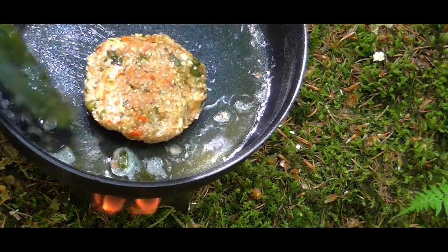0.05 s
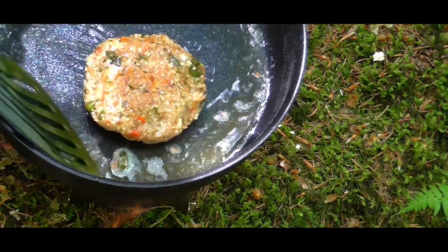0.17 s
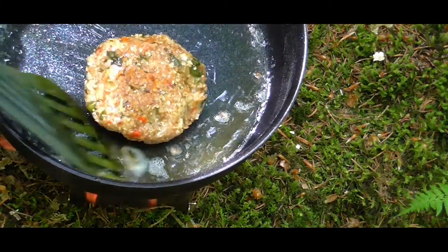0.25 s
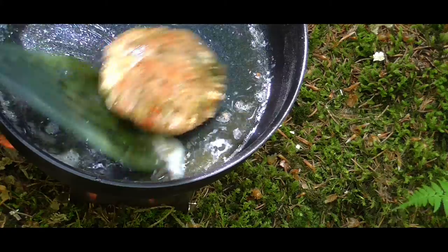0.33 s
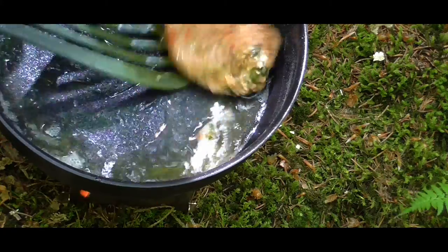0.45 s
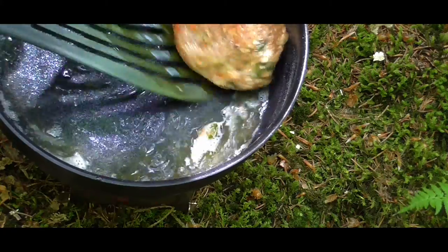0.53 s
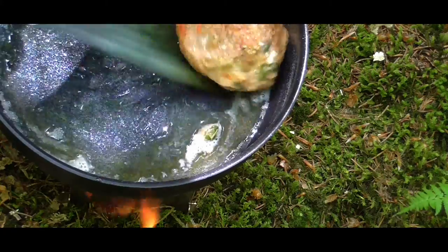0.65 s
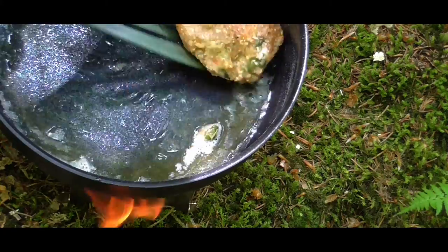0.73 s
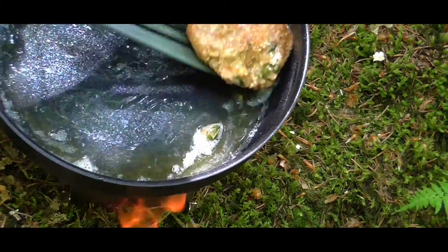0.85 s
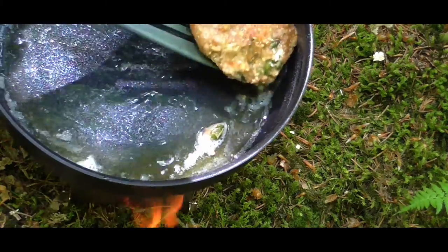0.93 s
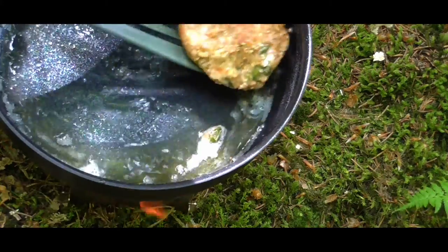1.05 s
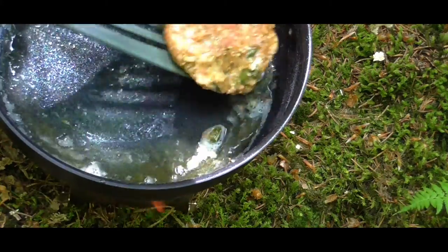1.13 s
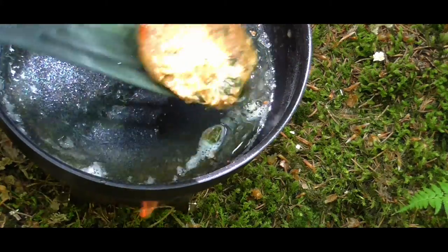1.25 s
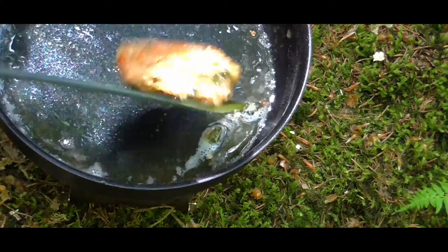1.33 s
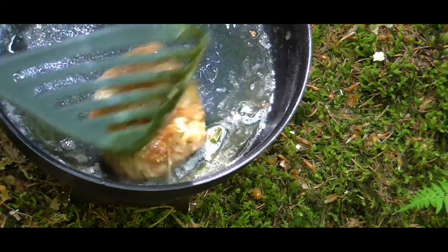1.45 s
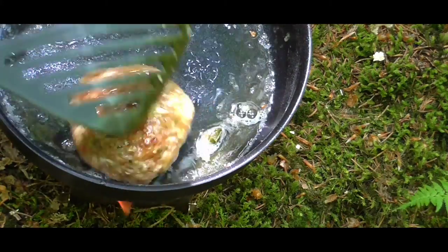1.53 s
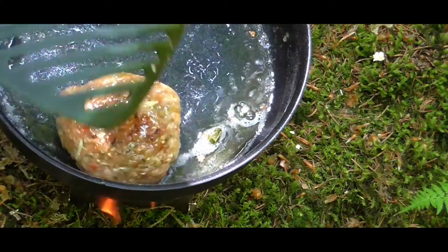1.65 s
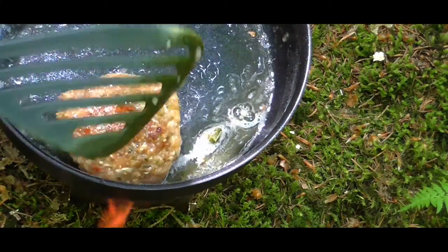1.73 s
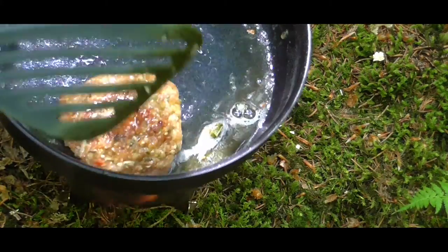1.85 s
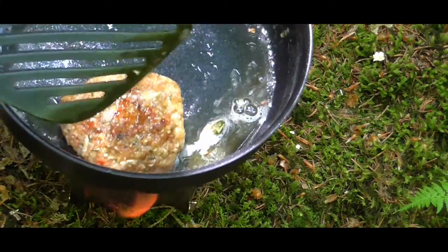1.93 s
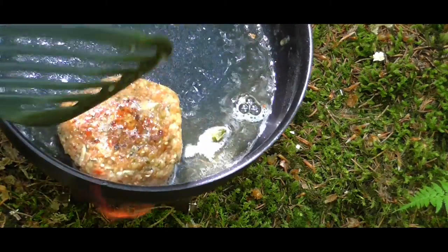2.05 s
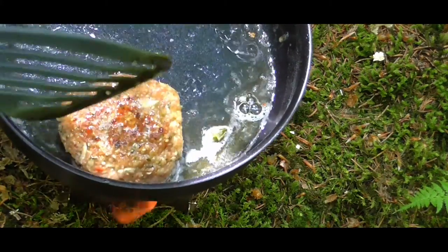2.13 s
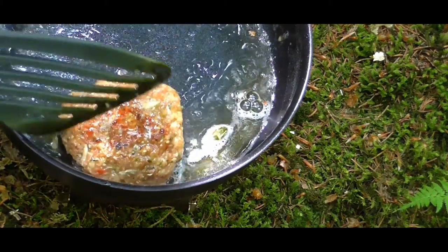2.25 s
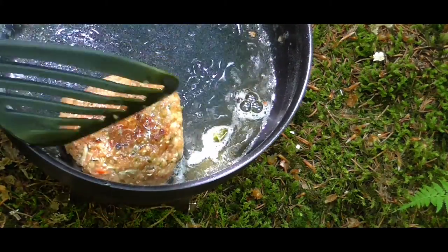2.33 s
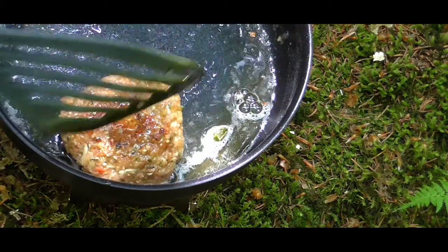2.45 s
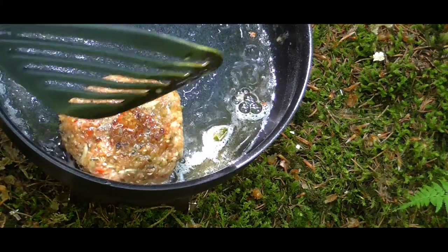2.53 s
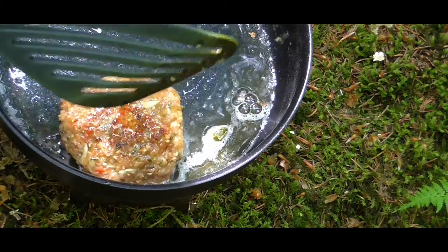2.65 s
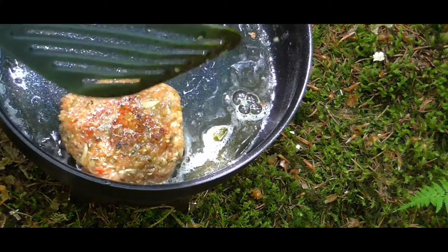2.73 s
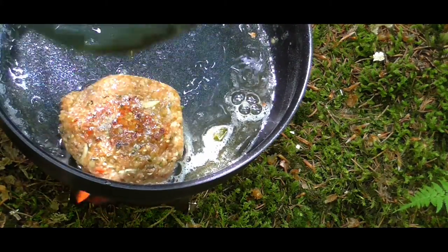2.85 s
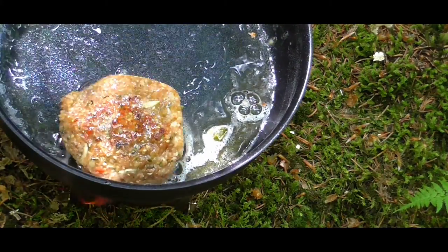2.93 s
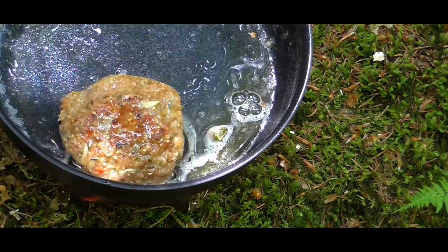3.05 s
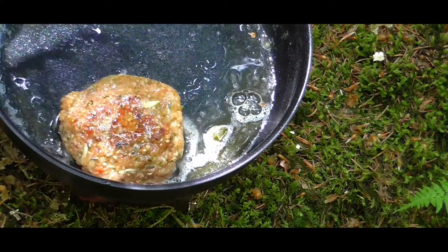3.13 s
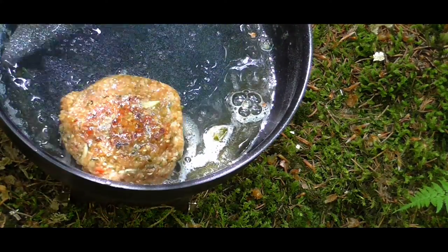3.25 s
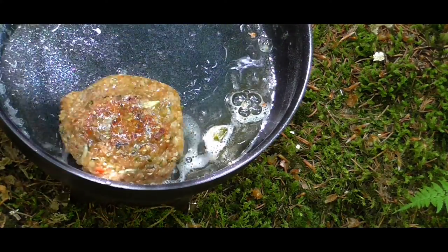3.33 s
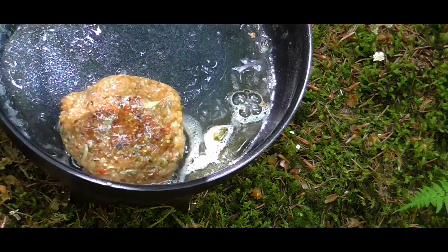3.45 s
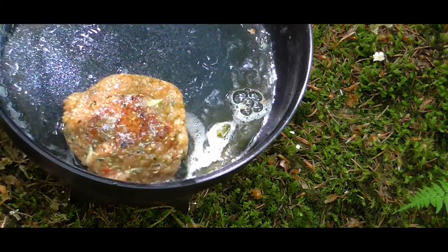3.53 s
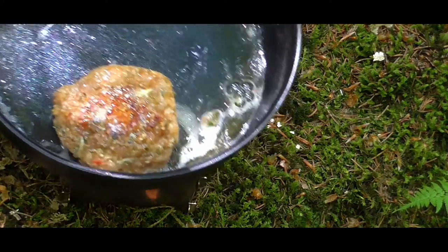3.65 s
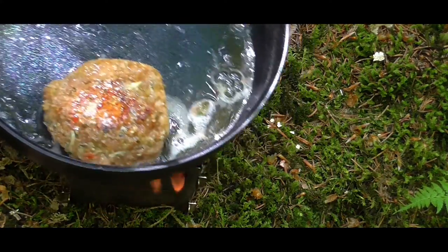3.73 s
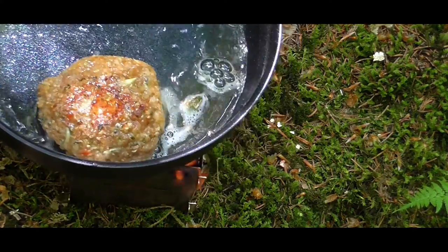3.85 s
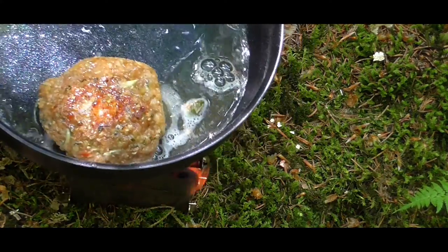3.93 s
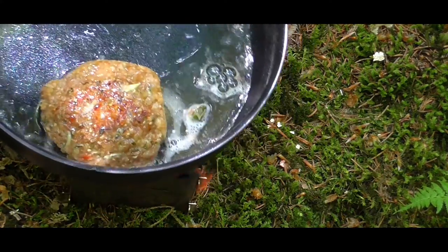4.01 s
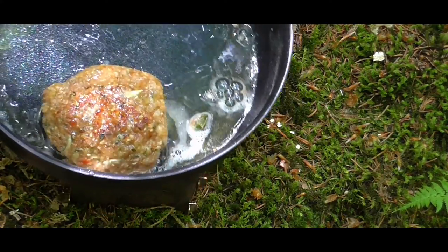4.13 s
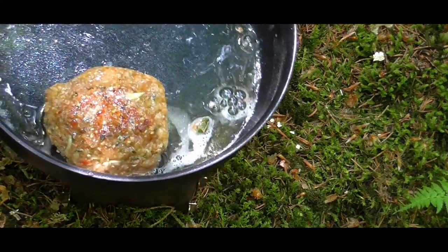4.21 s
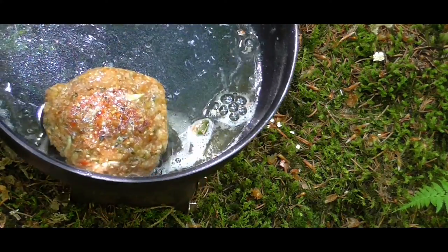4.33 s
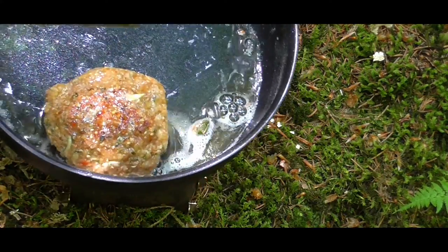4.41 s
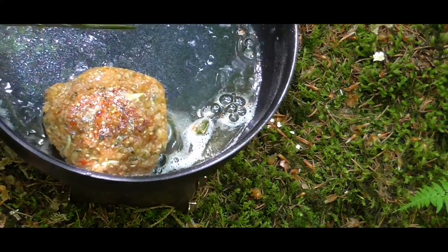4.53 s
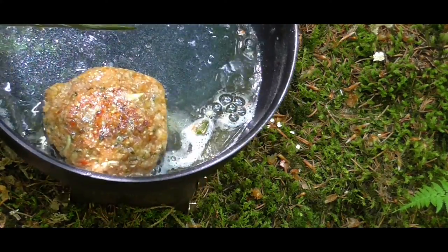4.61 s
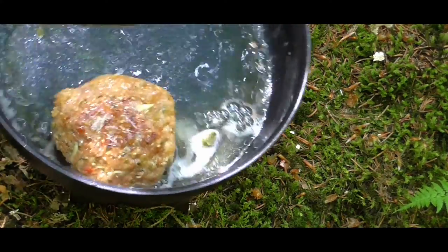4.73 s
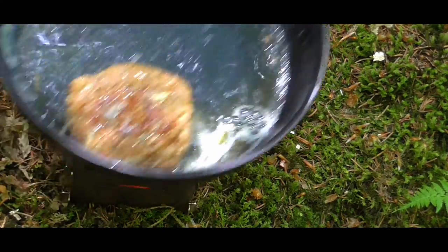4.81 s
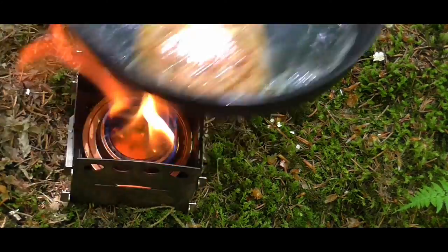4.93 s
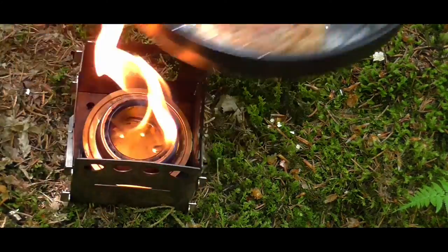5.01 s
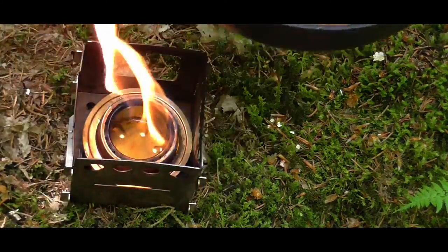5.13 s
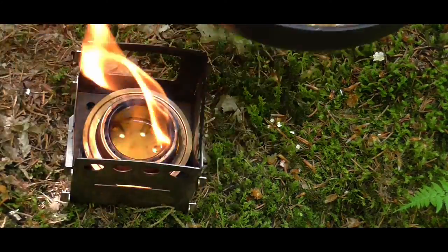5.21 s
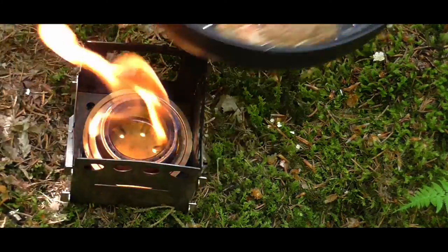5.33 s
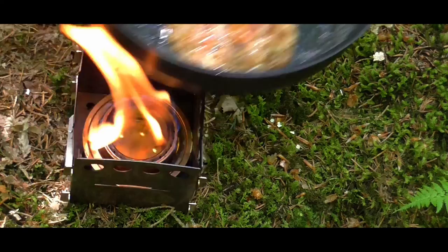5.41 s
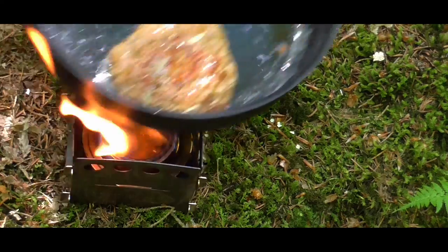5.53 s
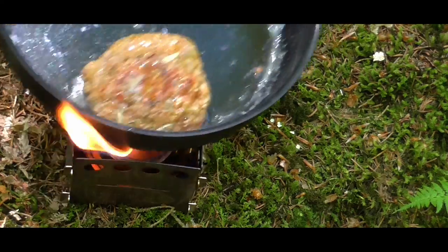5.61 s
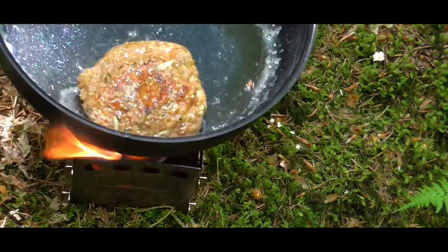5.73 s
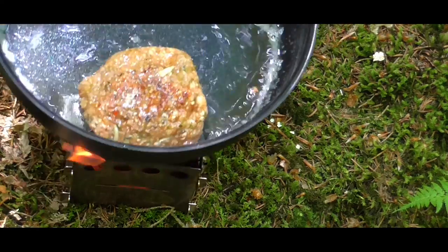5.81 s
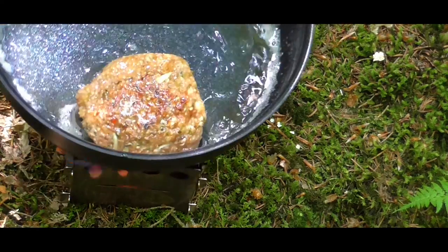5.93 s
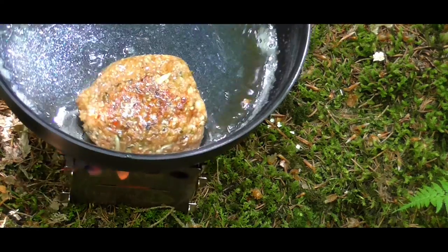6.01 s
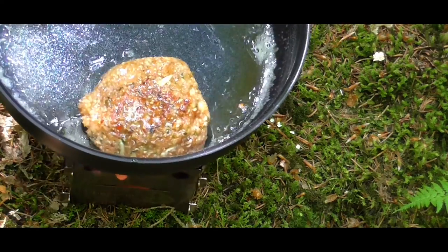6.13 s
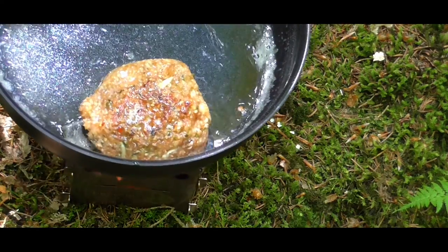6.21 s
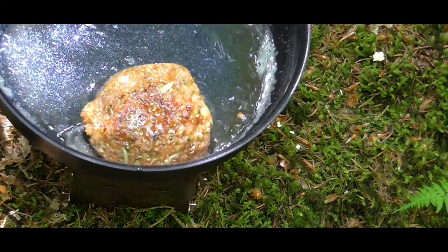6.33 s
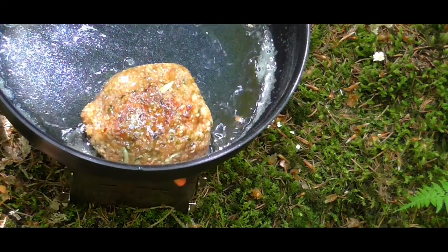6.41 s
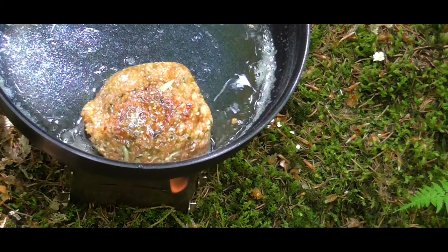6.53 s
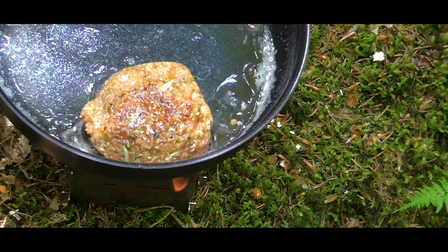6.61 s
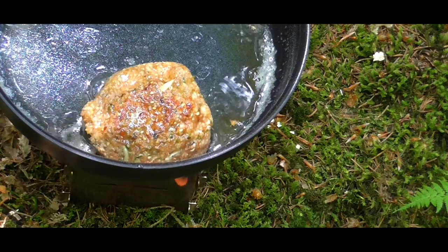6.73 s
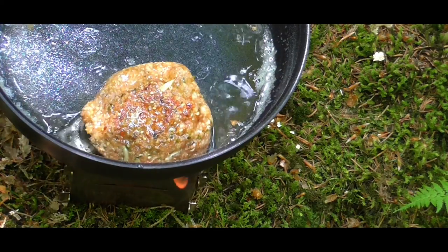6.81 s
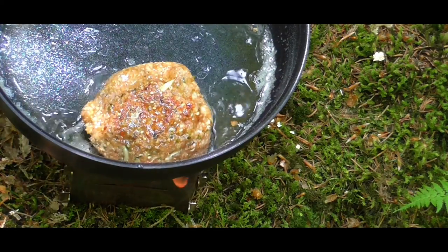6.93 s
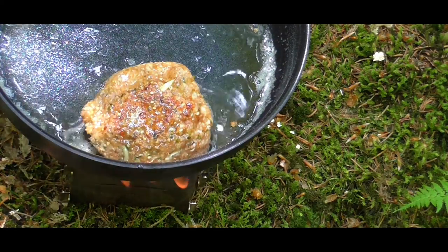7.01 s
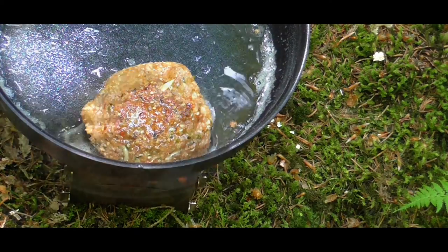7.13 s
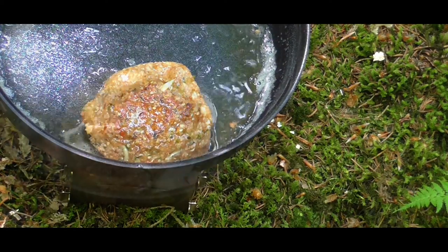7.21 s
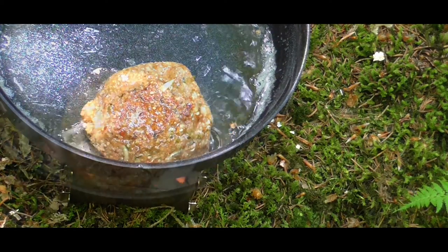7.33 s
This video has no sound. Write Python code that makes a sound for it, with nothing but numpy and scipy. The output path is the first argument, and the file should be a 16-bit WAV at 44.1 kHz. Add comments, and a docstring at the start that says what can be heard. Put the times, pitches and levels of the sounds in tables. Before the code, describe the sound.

Stereo, very near and dry: dense bubbling oil with fine hissing spray and sharp snapping drops. Light spatula taps and rubs come first, the sizzle dips as the patty is lifted, then surges after it flips. Later the pan rubs over its stove, is raised, and lands with the heaviest metallic knocks. One very loud spit hits the microphone just after six seconds. Behind lie quiet air, a low flame and sparse bird calls.

```python
"""Patty frying on a forest stove

Oil round a patty sizzles as dense ringing clicks and hiss; bursting drops pop as decaying resonant noise.
Spatula and stove knock on the pan (base tone, wall modes, crack) and scrape it (stick-slip clicks); it squeaks once.
A far bird whistles in narrow noise bands; air and flame are wide coloured noise.
A puff of air and one drop of fat reach the microphone."""
import sys
import numpy as np
from scipy import signal
from scipy.fft import rfft, irfft, next_fast_len
from scipy.io import wavfile

SR = 44100
rng = np.random.default_rng(int(sys.argv[2]) if len(sys.argv) > 2 else 0)


def put_to_file(sound):
    """Save the sound as 16-bit audio at rate SR, in the file named by the first command-line argument."""
    columns = np.atleast_2d(sound).T  # one column per channel
    safe = np.clip(columns, -1, 1)
    whole_steps = np.round(safe * 32767)
    wavfile.write(sys.argv[1], SR, whole_steps.astype(np.int16))


N = 324576
TIME_S = np.arange(N) / SR

# forest air spectrum: hz, relative_db (per Hz)
AIR_COLOUR = [(30, -43), (90, -3.5), (150, -4.5), (290, 2.5), (410, 1), (560, 1), (760, 1), (1040, -2),
              (1340, -4.5), (1700, -1), (1950, -11.5), (2600, -11), (3400, -9.5), (6000, -31)]
# left-right correlation of air and flame: hz, correlation (-1..1)
AIR_CORRELATION = [(30, 0), (80, 0.97), (140, 0.0084), (300, 0.62), (1100, 0.37), (2000, 0.87)]
# flame rumble before trim: time_s, level_db
FLAME_LEVEL = [(0.0, -66.5), (1.6, -77), (2.03, -69), (2.71, -68), (3.26, -63), (3.54, -70.5), (4.71, -71),
               (4.94, -67), (6.27, -70), (6.72, -69), (7.36, -78)]
# bird calls: start_s, level_db, pitch_hz (at the crest)
BIRD_WHISTLES = [(0.0, -48, 3580), (0.94, -50, 3640), (1.13, -64, 3560), (1.208, -53, 6600),
                 (1.95, -51.5, 3510), (2.99, -51.5, 3730), (5.28, -47, 3670)]
# oil bubbling round the patty before trim: time_s, level_db
OIL_LEVEL = [(0.0, -53), (0.18, -53), (0.61, -47), (0.96, -53), (1.21, -54), (1.47, -54), (1.66, -46.5),
             (2.79, -47), (3.2, -50), (4.0, -46), (4.28, -50), (4.49, -50), (5.02, -47), (5.56, -51),
             (5.86, -46), (6.44, -51), (7.2, -49), (7.36, -51)]
# sizzle flares as the patty slides or turns or the oil sloshes, before trim:
# crest_s, rise_s, fall_s, spray_db, sear_db
SIZZLE_FLARES = [(0.518, .33, .85, -51, -51), (1.6, .17, .6, -46, -51), (2.202, .15, .45, -47.5, -66),
                 (3.3, .5, .35, -52, -63), (3.78, .25, .12, -46, -50), (4.072, .1, .25, -44.5, -51),
                 (4.72, .1, .3, -53, -58.5), (5.12, .3, .6, -46, -57), (5.952, .45, .22, -56, -61),
                 (7.13, .18, .7, -58, -60)]
# bubbling spectrum: hz, relative_db (per Hz)
BUBBLE_SPECTRUM = [(1000, -25.5), (1700, -2.5), (2500, -11), (3000, -31), (3700, -2), (4900, -2), (6500, 0),
                   (7200, -1.5), (8000, -18), (11000, -10.5), (15000, -32)]
# fat spray spectrum: hz, relative_db (per Hz)
SPRAY_SPECTRUM = [(4000, -40), (8300, -2), (9200, -1), (10200, 2.5), (12300, -12), (13600, -19),
                  (16000, -48)]
# searing spectrum: hz, relative_db (per Hz)
SEAR_SPECTRUM = [(900, -15), (2500, -13.5), (4500, -8), (7000, -1), (9000, -8.5), (12000, 4.5), (15800, -7)]
# loudest drops bursting in the fat: start_s, level_db (over 1 ms), pitch_hz, nominal_width_hz
LOUD_DROPS = [(0.136, -24.5, 5840, 1190), (0.5077, -24, 8400, 3900), (0.532, -26, 6940, 1300),
              (0.5764, -26, 8100, 4000), (0.7214, -21.5, 9600, 6400), (1.0216, -21, 5870, 2000),
              (1.7534, -25.5, 6200, 5600), (1.8739, -27, 6200, 5500), (1.9773, -19.5, 10600, 1490),
              (2.0227, -22.5, 5170, 2300), (2.178, -23, 6600, 1200), (2.216, -23.5, 5400, 1200),
              (2.3316, -21.5, 5300, 1590), (2.394, -24.5, 6200, 5330), (2.529, -24, 8800, 7050),
              (2.647, -27, 6640, 900), (2.731, -24, 3950, 2980), (2.829, -20, 10400, 6340),
              (2.8755, -19.5, 4870, 6560), (3.1417, -21.5, 5500, 2000), (3.2336, -25, 5600, 4900),
              (3.2803, -26.5, 5900, 1300), (3.5828, -21.5, 8100, 6640), (3.7836, -15, 6400, 910),
              (4.026, -17.5, 7000, 4150), (4.3741, -25.5, 5240, 1720), (4.4229, -22, 11600, 6700),
              (5.0033, -23, 6570, 5600), (5.188, -30, 7300, 4500), (5.556, -21.5, 5500, 1200),
              (6.0078, -27.5, 6550, 2400), (6.0532, -10, 5600, 2950), (6.1905, -25.5, 6300, 2020),
              (6.3247, -30, 3330, 2560), (6.429, -28, 4940, 2500), (6.6618, -25.5, 7400, 2700),
              (6.813, -22.5, 5760, 900), (7.038, -27.5, 6600, 3070), (7.331, -25, 4930, 890)]
# spatula and stove blows on the pan, before part trims:
# start_s, level_db, base_pitch_hz, wall_db (re level), crack_db (re level)
PAN_BLOWS = [(0.098, -18, 867, -11.5, -2), (0.191, -35.5, 905, -5, 17), (0.203, -33.5, 943, -7, 6.5),
             (0.232, -26, 782, -4, -20), (0.2416, -23, 932, -8, -28), (0.967, -29.5, 728, -17, -22),
             (1.504, -29, 817, -6, -8), (1.526, -34, 693, -18, -3), (1.551, -22.5, 689, -11, -25),
             (1.573, -27, 970, -10, -16), (1.621, -34, 960, -22, -9), (2.041, -28.5, 980, -17, -18),
             (2.047, -24.5, 718, -19, -3.5), (2.077, -29.5, 982, -18, -18), (2.236, -29, 970, -4, -26),
             (2.352, -23.5, 683, -18, -14), (2.4, -30.5, 982, -11, -24), (5.656, -15.5, 613, -3, -6),
             (5.703, -16, 603, -11, -20), (5.828, -21, 544, -17.5, -22), (5.94, -23, 744, -13, -9),
             (6.027, -28, 710, -7, -13), (6.427, -35, 850, -7.5, -10)]
# pan wall resonances: pitch_hz, width_hz, relative_db
WALL_MODES = [(222, 120, -6), (330, 120, -4.5), (630, 117, 4.5), (750, 32, 6), (1060, 14, 6.5),
              (1410, 72, 1), (1603, 87, 5), (1865, 92, -1), (2141, 64, 7), (2300, 67, 1), (2893, 52, -5.5),
              (3614, 49, -2.5), (4530, 270, -5.5), (5500, 48, 1.5), (6200, 210, -5)]
# hard contact spectrum: hz, relative_db (per Hz)
CRACK_SPECTRUM = [(150, -15.5), (400, -0.5), (1500, -1.5), (2900, -13.5), (5200, 0.5), (6500, -0.5),
                  (8000, -4), (10500, 1.5), (16000, -17)]
# rubbing strokes on the pan, before part trims:
# crest_s, rise_s, fall_s, level_db, base_pitch_hz, base_width_hz, wall_db (re level)
RUB_STROKES = [(0.405, 0.11, 0.15, -42, 870, 200, 0), (0.54, 0.042, 0.068, -42, 790, 150, -20),
               (0.96, 0.2, 0.089, -45, 764, 160, -18), (1.56, 0.19, 0.13, -46, 766, 200, -9.5),
               (3.53, 0.046, 0.075, -43, 885, 130, -6.5), (3.65, 0.09, 0.12, -36, 591, 70, -13),
               (3.815, 0.12, .045, -34, 630, 161, -2.5), (3.95, .06, .06, -49.5, 630, 89, -16),
               (4.04, 0.058, 0.29, -25.5, 885, 165, -10.5), (4.705, 0.033, 0.096, -32.5, 706, 223, -9),
               (5.78, 0.079, 0.12, -42, 620, 45, -4), (5.89, 0.052, 0.057, -43.5, 540, 40, -18),
               (5.995, 0.029, 0.046, -42, 565, 40, -21), (6.07, 0.036, 0.12, -45, 774, 40, -19),
               (6.36, 0.3, 0.093, -42.5, 780, 60.4, -8)]
# squeak of the pan's base: time_s, level_db, pitch_hz
SQUEAK_CURVE = [(6.362, -64, 974), (6.375, -34.5, 1010), (6.386, -41, 1156), (6.396, -44, 1550),
                (6.41, -56, 1680)]
# phase lead of the left port: hz, phase_rad
PORT_PHASE_LEAD = [(0, 0), (7670, 0.031), (9390, -1.2), (10500, 0.49), (11900, 0.49), (16500, -0.012)]

AIR_DB = -51
RESTING_SPRAY_DB, RESTING_SEAR_DB = -7, -17  # patty still; re bubbling, before trims
# spatula holds the patty off the pan
LIFT_CREST_RISE_FALL_S, LIFT_DB = (1.33, .5, .15), -6
# random small drops: mean rate, exponent on spray gain, faintest level, range above it
DROPS_PER_S, DROPS_SPRAY_EXPONENT, DROP_MIN_DB, DROP_RANGE_DB = 27, .75, -35.5, 11
DROP_PITCH_HZ, DROP_WIDTH_HZ = (4170, 11250), (880, 7500)  # lowest, highest
SWELL_DB = 20  # change over one rise or fall time
PUFF_CREST_RISE_FALL_S, PUFF_DB = (3.42, 0.068, 0.054), -52
# drop of fat on the microphone: thump and short housing ring, as filter gains on an impulse
SPLAT_S, THUMP_GAIN_DB = 6.0537, 11
HOUSING_GAIN_DB, HOUSING_HZ, HOUSING_WIDTH_HZ = 12, 1550, 240
CUTOFF_HZ = 15900


def from_db(db):
    """Decibels to gain."""
    return 10 ** (np.asarray(db) / 20)


def rms_one(x):
    """Scale to rms 1."""
    return x / np.sqrt(np.mean(x ** 2) + 1e-20)


def head_one(x, seconds):
    """Scale energy to that of rms 1 held for the given time."""
    return x / np.sqrt(np.sum(x ** 2) / (seconds * SR) + 1e-20)


def in_time(rows, t):
    """Columns of a curve table, interpolated at times t."""
    s, *columns = np.transpose(rows)
    return [np.interp(t, s, c) for c in columns]


def per_bin(points, size):
    """Table interpolated over log frequency at each transform bin."""
    hz, value = np.transpose(points)
    bin_hz = np.arange(size // 2 + 1) * SR / size
    return np.interp(np.log(bin_hz + 1), np.log(hz), value)


def colour(x, spectrum):
    """Minimum-phase filter with the given spectrum, built by folding the cepstrum."""
    n = x.shape[-1]
    size = 2 * next_fast_len(n // 2 + 2048)
    cepstrum = irfft(np.log(from_db(per_bin(spectrum, size))))
    cepstrum[1:size // 2] *= 2
    cepstrum[size // 2 + 1:] = 0
    response = np.exp(rfft(cepstrum))
    return irfft(rfft(x, size) * response)[..., :n]


def cut(x, hz, kind, order=2):
    """Butterworth low- or high-pass."""
    sections = signal.butter(order, min(hz, .45 * SR), kind, fs=SR, output="sos")
    return signal.sosfilt(sections, x)


def resonator(hz, width_hz):
    """Coefficients of a two-pole resonance with about unit peak gain."""
    r = np.exp(-np.pi * width_hz / SR)
    return (1 - r * r) / 2 * np.array([1, 0, -1]), [1, -2 * r * np.cos(2 * np.pi * hz / SR), r * r]


def resonate(x, hz, width_hz):
    """Pass x through one resonance."""
    return signal.lfilter(*resonator(hz, width_hz), x + 1e-18)


def drift(knots_per_s, n):
    """Random piecewise-linear curve of rms 1."""
    knots = rng.standard_normal(8192)
    position = np.arange(n) / SR * knots_per_s % len(knots)
    return rms_one(np.interp(position, np.arange(len(knots)), knots))


def burst(t60_s, size):
    """Exponentially decaying noise."""
    return rng.standard_normal(size) * from_db(-60 * np.arange(size) / SR / t60_s)


def grains(per_s, spread_db, n, limit=4.48):
    """Random clicks of either sign: many small, a few large."""
    sizes = from_db(spread_db * np.minimum(rng.exponential(1, n), limit))
    sizes = sizes * rng.choice([-1, 1], n)
    return sizes * (rng.random(n) < per_s / SR)


def swell(crest_s, rise_s, fall_s, roundness):
    """Gain that climbs to 1 at the crest and sinks again."""
    away = np.maximum((crest_s - TIME_S) / rise_s, (TIME_S - crest_s) / fall_s)
    gain, near = np.zeros(N), away < 3
    gain[near] = from_db(-SWELL_DB * away[near] ** roundness)
    return gain


def add(out, s, x):
    """Mix x into out from time s."""
    i = max(round(s * SR), 0)
    out[i:i + len(x)] += x[:N - i]


def wide_noise(spectrum):
    """Coloured stereo noise, rms 1; mid and side weights set the correlation."""
    alike = np.clip(per_bin(AIR_CORRELATION, N), -1, 1)
    mid, side = rfft(rng.standard_normal((2, N)))
    stereo = np.sqrt(1 + alike) * mid + np.sqrt(1 - alike) * side * [[1], [-1]]
    return rms_one(colour(irfft(stereo, N), spectrum))


def surroundings(flame_trim_db=3.5, waver_db=2.0):
    """Wide forest air with a wavering level, plus the flame's low rumble."""
    rumble = wide_noise([(25, -45), (40, -18), (60, -10.5), (85, -7.5), (115, -9.5), (170, -13.5), (400, -45)])
    flame = from_db(in_time(FLAME_LEVEL, TIME_S)[0] + flame_trim_db) * rumble
    air = from_db(AIR_DB + waver_db * drift(6.3, N)) * wide_noise(AIR_COLOUR)
    return air + flame


def bird(swell_s=.09, width_hz=380, fall_hz_per_s=500):
    """Falling whistles, smeared by the trees into narrow noise bands that swell and fade."""
    out, t = np.zeros(N), TIME_S[:SR // 2]
    shape = (t / swell_s * np.exp(1 - t / swell_s)) ** 2
    for s, db, hz in BIRD_WHISTLES:
        in_phase, across = cut(rng.standard_normal((2, len(t))), width_hz / 2, "low")
        phase = 2 * np.pi * np.cumsum(hz - fall_hz_per_s * (t - swell_s)) / SR
        call = rms_one(in_phase * np.cos(phase) + across * np.sin(phase))
        # a call at the very start enters at its crest
        begun = round(swell_s * SR) if s < swell_s else 0
        add(out, s, (from_db(db) * call * shape)[begun:])
    return out


def frying_strength(roundness=1.5):
    """Bubbling, spray and sear gains: all follow the oil; spray and sear also flare, summed as power."""
    lift_db = LIFT_DB * swell(*LIFT_CREST_RISE_FALL_S, roundness)
    bubbles = from_db(in_time(OIL_LEVEL, TIME_S)[0] + lift_db)
    spray_power = (bubbles * from_db(RESTING_SPRAY_DB)) ** 2
    sear_power = (bubbles * from_db(RESTING_SEAR_DB)) ** 2
    for s, rise, fall, spray_db, sear_db in SIZZLE_FLARES:
        flare = swell(s, rise, fall, roundness)
        spray_power = spray_power + (from_db(spray_db) * flare) ** 2
        sear_power = sear_power + (from_db(sear_db) * flare) ** 2
    return bubbles, np.sqrt(spray_power), np.sqrt(sear_power)


def fizz(spectrum, per_s, spread_db, clump_db, hiss_db,
         bubble_width_hz=1100, patchy_db=2.5, scatter_db=-2.5):
    """Tiny bubbles burst in clumps, each ringing a few cycles, over even hiss; stereo, rms 1."""
    clicks = grains(per_s * from_db(clump_db * drift(45, N)), spread_db, N)
    pitches_hz = np.linspace(1800, 15200, num=16)
    dealt = rng.integers(0, len(pitches_hz), N)
    # each pitch reads the level curve at its own offset
    patches = from_db(patchy_db * drift(22, N))
    bubbles = np.zeros(N)
    for k, hz in enumerate(pitches_hz):
        ringing = resonate(clicks * (dealt == k), hz, bubble_width_hz)
        bubbles += ringing * np.roll(patches, rng.integers(N))
    # tearing films add broad ticks; the pan scatters both for a few ms
    direct = rms_one(rms_one(bubbles) + 0.44 * rms_one(clicks))
    scatter = [rms_one(signal.fftconvolve(direct, burst(0.017, size=768))[:N]) for _ in range(2)]
    mid = direct + from_db(scatter_db) * scatter[0] + from_db(hiss_db) * rng.standard_normal(N)
    side = 0.12 * cut(scatter[1], 10200, "high")
    return rms_one(colour(mid + side * [[1], [-1]], spectrum))


def sizzle(bubbles, spray, sear, bubbles_trim_db=1.5, spray_trim_db=-1.5, sear_trim_db=9.5):
    """Oil bubbles round the patty and throws fine spray; wet meat hisses brightly on the metal."""
    bubbling = fizz(BUBBLE_SPECTRUM, per_s=4500, spread_db=4.5, clump_db=3.5, hiss_db=-3.0)
    spraying = fizz(SPRAY_SPECTRUM, per_s=3200, spread_db=8.0, clump_db=4.0, hiss_db=-29)
    searing = fizz(SEAR_SPECTRUM, per_s=3200, spread_db=6.0, clump_db=0.0, hiss_db=-31)
    return (bubbles * from_db(bubbles_trim_db) * bubbling
            + spray * from_db(spray_trim_db) * spraying
            + sear * from_db(sear_trim_db) * searing)


def small_drops(spray):
    """Random rows shaped like LOUD_DROPS, denser where spray is strong; most are faint."""
    rate = spray ** DROPS_SPRAY_EXPONENT
    due = np.cumsum(rate / rate.mean()) * DROPS_PER_S / SR
    when, size, pitch, width = rng.random((600, 4))[:int(due[-1])].T
    start_s = np.interp(when * due[-1], due, TIME_S)
    level_db = DROP_MIN_DB + DROP_RANGE_DB * size ** 2
    pitch_hz = DROP_PITCH_HZ[0] * (DROP_PITCH_HZ[1] / DROP_PITCH_HZ[0]) ** pitch
    width_hz = DROP_WIDTH_HZ[0] * (DROP_WIDTH_HZ[1] / DROP_WIDTH_HZ[0]) ** width
    return list(zip(start_s, level_db, pitch_hz, width_hz))


def pops(spray, snap_t60_s=0.0037, tail_t60_s=0.073, tail_db=-19, tick_db=-17, tick_hz=1200):
    """A drop flashes to steam: a snap rings its cavity and spattered fat trails after it."""
    out, t = np.zeros(N), TIME_S[:1024]
    tail = from_db(tail_db) * .5 * from_db(-60 * t / tail_t60_s)
    dying = from_db(-60 * t / snap_t60_s) + tail
    snaps = rng.standard_normal((700, len(t))) * dying
    ticks = cut(snaps, tick_hz, "high")
    for (s, db, hz, width), snap, tick in zip(LOUD_DROPS + small_drops(spray), snaps, ticks):
        cavity = resonate(resonate(snap, hz, 1.32 * width), hz, 2.1 * width)
        pop = cavity + from_db(tick_db) * tick
        add(out, s, from_db(db) * head_one(pop, 1 / 1000))
    return out


def pan_wall(x):
    """Wall modes in alternating sign; random strengths stand for the place of contact."""
    luck_db = rng.normal(0, 1.2, len(WALL_MODES))
    return sum((-1) ** k * from_db(db + luck_db[k]) * resonate(x, hz, width)
               for k, (hz, width, db) in enumerate(WALL_MODES))


def knocks(base_t60_s=0.063, base_db=-1.0, clack_db=-4.5, crack_trim_db=1.0,
           rattle_t60_s=0.011, rattle_db=-6, crack_t60_s=0.055,
           ring_hz=583, ring_width_hz=7, ring_db=1.0):
    """Each blow rings the base, whose pitch shifts with its load, and cracks into the wall modes."""
    out, t = np.zeros(N), TIME_S[:SR // 3]
    size = len(t)
    for s, db, hz, wall_db, crack_db in PAN_BLOWS:
        rattle = head_one(burst(rattle_t60_s, size), 1 / SR)
        contact = signal.unit_impulse(size) + from_db(rattle_db) * rattle
        envelope = from_db(-60 * t / base_t60_s) * (1 - np.exp(-t / 0.0015))
        base = head_one(np.sin(2 * np.pi * hz * t) * envelope, 0.0046)
        # a blow near the free pan's note leaves it ringing
        base = base + from_db(ring_db) * resonate(base, ring_hz, ring_width_hz)
        clack = head_one(resonate(resonate(burst(0.098, size), hz, 280), hz, 1120), 0.0029)
        walls = head_one(pan_wall(contact), 0.0079)
        crack = head_one(colour(burst(crack_t60_s, size), CRACK_SPECTRUM), 0.0034)
        blow = (from_db(base_db) * base + from_db(clack_db) * clack
                + from_db(wall_db) * walls + from_db(crack_db + crack_trim_db) * crack)
        add(out, s + 0.00097, from_db(db) * blow)
    return cut(out, 170, "high", order=3)


def scrapes(slips_per_s=450, spread_db=2.0, judder_db=3.0, base_db=2.0, wall_trim_db=2.0,
            grit_db=-7, body_db=-18, roundness=1.32):
    """Stick-slip sends dense uneven clicks into the pan; each stroke swells and fades."""
    out, n = np.zeros(N), SR
    for s, rise, fall, db, hz, width, wall_db in RUB_STROKES:
        start = max(round(s * SR) - n // 2, 0)
        push = swell(s, rise, fall, roundness)[start:start + n]
        slips = rms_one(grains(slips_per_s, spread_db, n, limit=5.4)) + .5 * rng.standard_normal(n)
        slips = slips * from_db(judder_db * drift(129.55, n))
        # contact point sets base pitch and damping
        base = cut(cut(resonate(slips, hz, width), 480, "high"), 1230, "low")
        body = resonate(cut(slips, 140, "high"), 410, 110)
        # wall modes and grit share one level: both grow as contact hardens
        walls = cut(cut(pan_wall(slips), 1000, "high"), 6000, "low")
        grit = cut(cut(slips, 3500, "high"), 4000, "low")
        hard = rms_one(walls) + from_db(grit_db) * rms_one(grit)
        sound = (from_db(base_db) * rms_one(base) + from_db(body_db) * rms_one(body)
                 + from_db(wall_db + wall_trim_db) * hard)
        out[start:start + n] += from_db(db) * sound * push
    return out


def on_microphone(tick_gain_db=-2):
    """Puff and splat thump push the two ports oppositely; housing ring and tick are alike in both."""
    hit, together, opposed = signal.unit_impulse(2048), np.zeros(N), np.zeros(N)
    ring = from_db(HOUSING_GAIN_DB) * resonate(hit, HOUSING_HZ, HOUSING_WIDTH_HZ)
    tick = from_db(tick_gain_db) * cut(hit, 9300, "high")
    add(together, SPLAT_S, ring + tick)
    add(opposed, SPLAT_S, from_db(THUMP_GAIN_DB) * cut(cut(hit, 1300, "low"), 60, "high"))
    wind = rms_one(cut(cut(rng.standard_normal(N), 100, "low"), 28, "high"))
    puff = from_db(PUFF_DB) * swell(*PUFF_CREST_RISE_FALL_S, roundness=2) * wind
    return together + (opposed + puff) * [[-1], [1]]


def squeak(rough=0.044):
    """As the pan slides into place, slips of its base lock into a rough rising note."""
    out, t = np.zeros(N), np.arange(SQUEAK_CURVE[0][0], SQUEAK_CURVE[-1][0], 1 / SR)
    db, hz = in_time(SQUEAK_CURVE, t)
    phase = 2 * np.pi * np.cumsum(hz * (1 + rough * drift(430, len(t)))) / SR
    add(out, t[0], from_db(db) * rms_one(np.sin(phase)))
    return out


def scene():
    """Pan close and central; ground and trees return a faint wide scatter."""
    bubbles, spray, sear = frying_strength()
    pan = sizzle(bubbles, spray, sear) + knocks() + scrapes() + squeak() + pops(spray)
    returns = np.array([signal.fftconvolve(side, head_one(burst(0.14, size=4096), 1 / SR))[:N]
                        for side in pan])
    return pan + from_db(-25) * returns + bird() + surroundings() + on_microphone()


def record(dry):
    """Two microphone ports differ in treble colour and phase; an elliptic low-pass cuts the top."""
    left, right = dry
    left = irfft(rfft(left) * np.exp(1j * per_bin(PORT_PHASE_LEAD, N)), N)
    left = from_db(-1.26) * (left - 0.47 * resonate(left, 9200, 4200))
    right = from_db(-1.0) * (right + 0.24 * resonate(right, 11400, 1600))
    low_pass = signal.ellip(10, .1, 70, CUTOFF_HZ, fs=SR, output="sos")
    return signal.sosfilt(low_pass, np.array([left, right]))


dry = scene()
out = record(dry)
put_to_file(out)
```